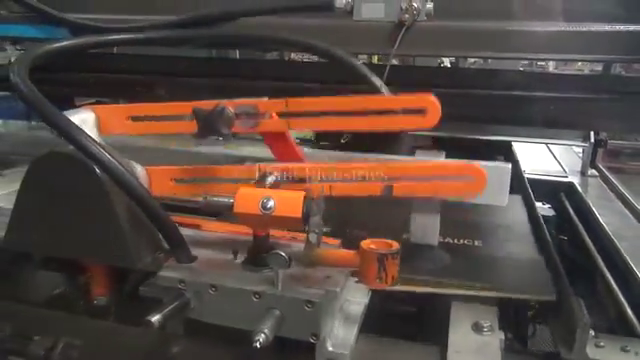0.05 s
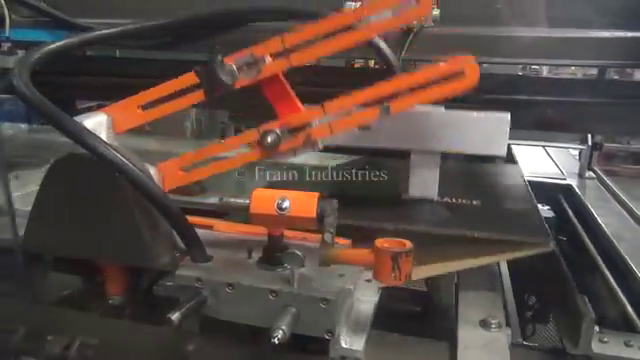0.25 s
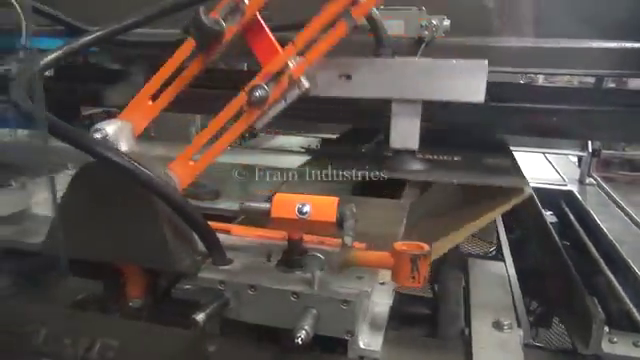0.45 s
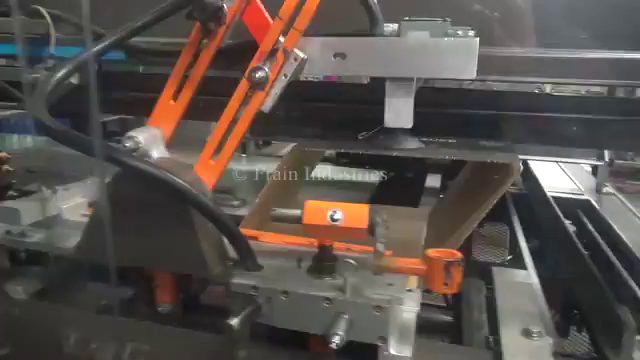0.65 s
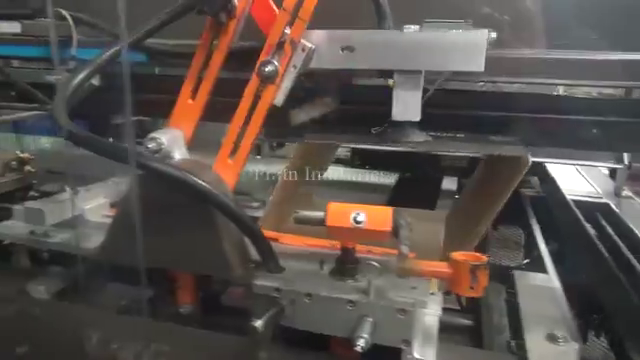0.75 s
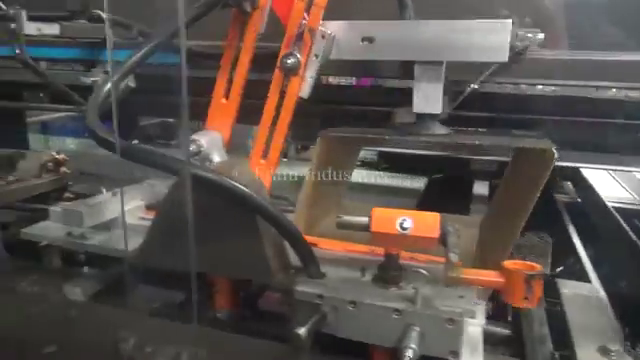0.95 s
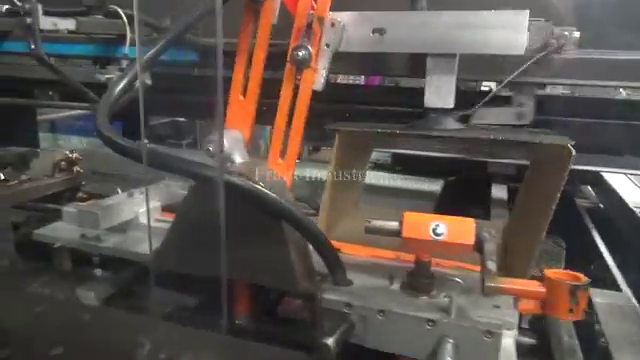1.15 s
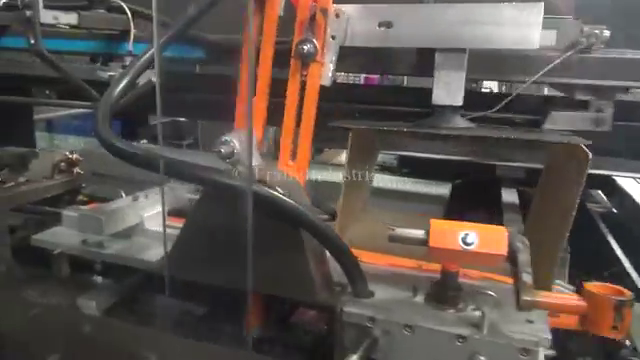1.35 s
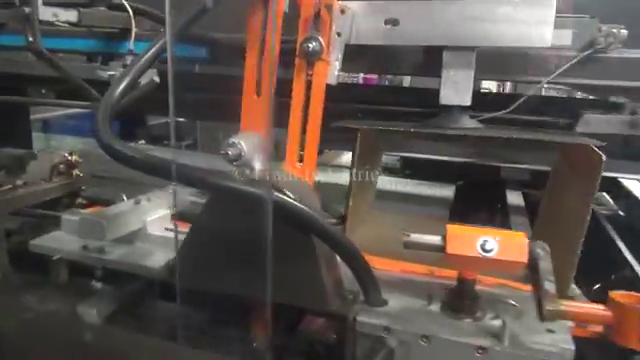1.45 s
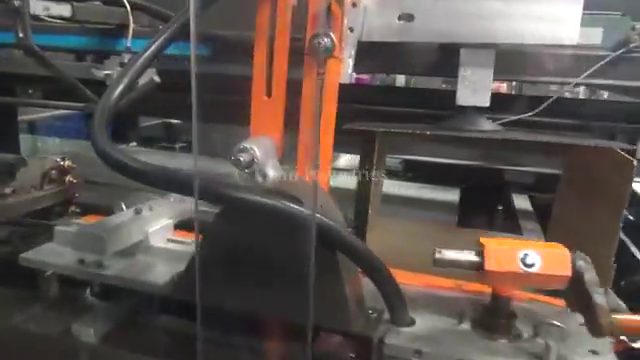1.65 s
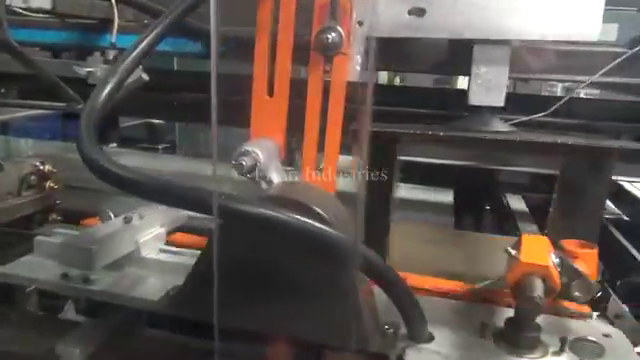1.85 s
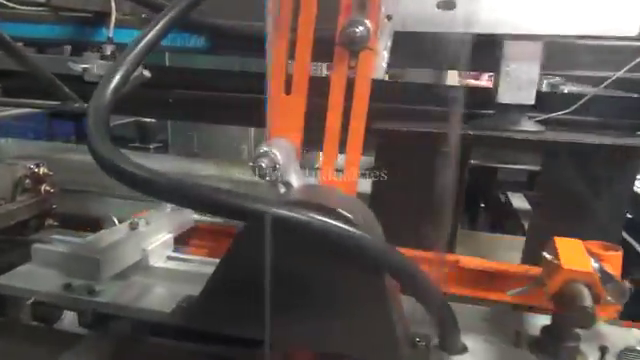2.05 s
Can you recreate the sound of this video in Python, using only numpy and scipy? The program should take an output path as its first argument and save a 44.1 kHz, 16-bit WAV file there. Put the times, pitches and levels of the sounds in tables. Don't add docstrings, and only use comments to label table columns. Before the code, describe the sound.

Box-erecting machine cycling: motor rumble, hard stop hit and cardboard slap, later knocks and a pneumatic hiss

```python
import sys
import numpy as np
from scipy import signal
from scipy.fft import rfft, irfft
from scipy.io import wavfile
from scipy.ndimage import uniform_filter1d

SR = 44100
rng = np.random.default_rng(int(sys.argv[2]) if len(sys.argv) > 2 else 0)


def linear_from_db(decibels):
    return 10 ** (np.asarray(decibels, float) / 20)


def generate_wav(sig):
    pcm = np.round(np.clip(np.atleast_2d(sig).T, -1, 1) * 32767).astype(np.int16)
    wavfile.write(sys.argv[1], SR, pcm)


N = 92610


def level(x, db):
    return x * linear_from_db(db) / np.sqrt(np.mean(x ** 2))


def curve(rows):
    rows = np.array(rows)
    return np.interp(np.arange(N) / SR, rows[:, 0], rows[:, 1])


def walk(rate_hz):
    held = int(SR / rate_hz)
    steps = np.repeat(rng.standard_normal(200)[:N // held + 1], held)
    smooth = uniform_filter1d(uniform_filter1d(steps, held), held)
    return 1.3 * smooth[:N]


def ring(push, hz, t60):
    pole = np.exp((2j * np.pi * hz - np.log(1000) / t60) / SR)
    return signal.lfilter([1], [1, -pole], push + 0j).imag


def narrow_band(hz, width_hz):
    once = ring(rng.standard_normal(N), hz, 1.4 / width_hz)
    return level(ring(once, hz, 1.4 / width_hz), 0)


def coloured(points, flicker_db, rate_hz, grit_db):
    point_hz, point_db = np.array(points).T
    hz = np.maximum(np.arange(N // 2 + 1) * SR / N, 1)
    grains = rng.standard_normal(N)
    grit = np.minimum(rng.exponential(size=N), 4)
    colour_db = np.interp(np.log(hz), np.log(point_hz), point_db, left=-90, right=-90)
    spectrum = rfft(grains * linear_from_db(grit_db * grit)) * linear_from_db(colour_db)
    octave = np.log2(hz / 30)
    total = np.zeros(N)
    for k in range(10):
        share = np.clip(1 - abs(octave - k), 0, 1)
        total += irfft(spectrum * share, N) * linear_from_db(flicker_db * walk(rate_hz))
    return level(total, 0)


def puffs(rows):
    t = np.arange(N) / SR
    total = np.zeros(N)
    for start, db, attack, hold, t60 in rows:
        swell = np.clip((t - start) / attack, 0, 1) ** 2
        fading = np.maximum(t - start - attack - hold, 0)
        total += swell * linear_from_db(db - 60 * fading / t60)
    return total


def blows(hits, body, scatter_db, crack_db):
    out = np.zeros(N)
    t = np.arange(SR // 4) / SR
    hz, gain_db, t60 = np.array(body).T[:, :, None]
    sign = (-1) ** np.arange(len(body))[:, None]
    lucks = rng.standard_normal((16, 2, 14, 1))[:, :, :len(body)]
    noises = rng.standard_normal((16, len(t)))
    for (start, db, contact_ms), (luck_db, luck_hz), noise in zip(hits, lucks, noises):
        fade = linear_from_db(gain_db + scatter_db * luck_db - 60 * t / t60)
        rings = sign * fade * np.sin(2 * np.pi * hz * (1 + .006 * luck_hz) * t)
        push = np.sin(np.pi * np.clip(t[:400] * 1000 / (2 * contact_ms), 0, 1)) ** 2
        knock = signal.fftconvolve(rings.sum(0), push)
        crack = linear_from_db(crack_db) * noise * np.exp(-t / .0013)
        knock = knock / abs(knock).max() + signal.fftconvolve(crack, push / np.linalg.norm(push))
        i = int(start * SR)
        out[i:i + len(knock)] += linear_from_db(db) * knock[:N - i]
    return out


def hall_floor():
    # f/Hz, level/dB
    hall_colour = [(15, -33), (25, -21), (59, -2.5), (164, -9.5), (762, -31), (2360, -26), (2700, -28.5),
                   (9810, -33), (15500, -39.5)]
    return linear_from_db(-41.5) * coloured(hall_colour, flicker_db=2.06, rate_hz=8.08, grit_db=3.0)


def drives():
    # t/s, level/dB
    effort = [(0, -37.5), (.1, -35), (.3, -32), (.45, -29.5), (.62, -32), (.74, -35), (.9, -34),
              (1.05, -38), (1.22, -35.5), (1.45, -41.5), (1.58, -40.5), (1.7, -29.5), (1.88, -37),
              (2.1, -40.5)]
    # f/Hz, level/dB
    frame_colour = [(24, -29), (40, -30), (140, 0.5), (205, -5.5), (320, -8.5), (377, -2.5), (916, -9),
                    (1780, -14.5), (5000, -34.5), (6500, -75), (11000, -120)]
    # f/Hz, width/Hz, level/dB
    resonances = [(113, 16, -15.5), (258.6, 49, -4), (318.6, 26.5, -5), (459, 67, -8)]
    broad = coloured(frame_colour, flicker_db=2.0, rate_hz=13.73, grit_db=1.5)
    drone = np.zeros(N)
    for hz, width_hz, db in resonances:
        tone = ring(rng.standard_normal(N), hz, 2.0 / width_hz)
        drone += level(tone, db) * linear_from_db(2.6 * walk(9.22))
    return linear_from_db(curve(effort)) * (linear_from_db(-2.0) * broad + linear_from_db(-3.0) * drone)


def hum():
    # t/s, level/dB
    motor_load = [(0, -51), (.45, -37), (1, -53), (1.5, -39), (1.95, -34), (2.1, -46)]
    hz = 61.74 * (1 + 0.0545 * walk(12))
    tone = np.sin(2 * np.pi * np.cumsum(hz) / SR)
    return linear_from_db(curve(motor_load) + 1.8 * walk(14.0)) * tone


def leak():
    # t/s, level/dB
    leak_strength = [(0, -41.5), (.25, -44.5), (.42, -40), (.62, -49), (1, -54), (1.55, -67), (1.75, -43.5),
                     (1.9, -53), (2.1, -54)]
    # f/Hz, level/dB
    leak_colour = [(1500, -21), (2500, -5), (4000, -9), (6800, -3.5), (9000, -6), (11200, -5), (15000, -8),
                   (15600, -20)]
    return linear_from_db(curve(leak_strength) + 1.5) * coloured(leak_colour, flicker_db=.8, rate_hz=20, grit_db=1.5)


def whine():
    # t/s, extra level/dB
    inverter_load = [(0, -1), (.2, -1), (.24, 7), (.285, 7), (.305, -1), (.66, -1), (.7, 0), (1.2, 0),
                     (1.35, -2), (2.1, -2)]
    width_hz = 90
    whistle = level(ring(rng.standard_normal(N), 10106, 2.2 / width_hz), -54)
    return whistle * linear_from_db(curve(inverter_load) + walk(12))


def belts():
    # f/Hz, width/Hz, level/dB
    bands = [(3700, 500, -60), (9700, 1300, -58)]
    return sum(linear_from_db(db + 2.5 * walk(70)) * narrow_band(hz, width_hz) for hz, width_hz, db in bands)


def scrapes():
    # t/s, level/dB, attack/s, hold/s, fade by 60 dB/s
    strokes = [
        (.04, -37, 0.14, 0.15, 0.18),
        (1.612, -33.5, 0.005, 0.047, 0.086),
        (1.665, -26.5, .012, 0.022, 0.13),
        (0.345, -30, 0.014, 0.088, 0.17),
        (.462, -27.5, 0.0018, 0.01, 0.099),
        (0.5, -49, 0.0038, 0.03, 0.059),
        (.755, -40.5, .003, 0.031, 0.071),
    ]
    # f/Hz, level/dB
    board_colour = [(250, -13), (500, 5), (1100, 4), (2200, -11), (4000, -19.5), (6000, -35)]
    return puffs(strokes) * coloured(board_colour, flicker_db=3.5, rate_hz=70, grit_db=2.0)


def box():
    # f/Hz, level/dB, fade by 60 dB/s
    box_modes = [(190, -12, .12), (255, -10, .25), (332, 0, .4), (436, -10, .3), (624, -12, .15)]
    # t/s, peak level/dB, contact/ms
    box_hits = [
        (1.6105, -14.5, .5),
        (1.649, -22, .6),
        (1.818, -25, .8),
        (1.87, -30, .8),
        (.255, -27, .8),
    ]
    return blows(box_hits, box_modes, scatter_db=4.8, crack_db=-40)


def vents():
    # t/s, level/dB, attack/s, hold/s, fade by 60 dB/s
    vent_puffs = [
        (.34, -44, .05, .07, .3),
        (1.671, -22.5, .016, .008, .12),
        (1.690, -26, .008, .004, .1),
        (1.70, -40, .02, .06, .32),
        (.572, -45, .008, .005, .08),
        (1.17, -45, .04, .06, .1),
        (1.21, -47, .04, .018, .06),
        (1.536, -50, .005, .025, .08),
    ]
    # f/Hz, level/dB
    air_colour = [(700, -30), (1250, -2), (3900, -8), (5200, 0), (6800, -6), (12000, -4), (15000, -5),
                  (15600, -15)]
    return puffs(vent_puffs) * coloured(air_colour, flicker_db=2.4, rate_hz=90, grit_db=3)


def pins():
    # f/Hz, level/dB, fade by 60 dB/s
    pin_modes = [(11500, 0, .13), (14000, -6, .08)]
    # t/s, peak level/dB, contact/ms
    pin_hits = [
        (.37, -38, .03),
        (.39, -38, .03),
        (.784, -44, .03),
        (.849, -42, .03),
        (.91, -46, .03),
        (1.54, -42, .025),
        (1.553, -43, .03),
    ]
    return blows(pin_hits, pin_modes, scatter_db=2, crack_db=-24)


def stops():
    # f/Hz, level/dB, fade by 60 dB/s
    stop_modes = [(98.7, -11, 0.12), (216, -8, 0.083), (296.4, -7.5, 0.14), (372.5, -4, 0.096),
                  (450, -2, 0.032), (704, -8, 0.038), (830, -11, 0.06), (1340, -32, 0.051),
                  (2280, -1.5, 0.011), (5900, 1, 0.0065), (7400, -28, 0.013)]
    # t/s, peak level/dB, contact/ms
    stop_hits = [
        (.3966, -5.5, 0.12),
        (.4035, -9, 0.98),
        (.424, -15, 0.67),
    ]
    return blows(stop_hits, stop_modes, scatter_db=4.0, crack_db=-21)


def ticks():
    # t/s, peak level/dB, f/Hz
    snaps = [
        (.3975, -20, 6500),
        (.4607, -4.5, 850),
        (1.5981, -19, 10500),
        (1.6098, -28, 4200),
        (1.6107, -20, 400),
        (1.6842, -13, 260),
        (1.6985, -14, 280),
        (1.7325, -23, 250),
    ]
    t = np.arange(N) / SR
    total = np.zeros(N)
    for start, db, hz in snaps:
        cycles = (t - start) * hz
        total -= linear_from_db(db + 4) * np.exp(-(cycles / .5) ** 2) * np.sin(2 * np.pi * cycles)
    return total


def flaps():
    # f/Hz, level/dB, fade by 60 dB/s
    flap_modes = [(116.5, -4, 0.17), (189, 2.5, 0.041), (305, 0, 0.063), (470, 2.5, 0.073),
                  (540, -1.5, 0.022), (730, -36.5, 0.014), (776, -11.5, 0.1), (885, -6.5, 0.025),
                  (1135, -8, 0.032), (1430, -3, 0.02), (1624, -0.5, 0.012), (1900, -4, .022),
                  (2220, -11, 0.012)]
    # t/s, peak level/dB, contact/ms
    flap_hits = [
        (.4594, -2, 0.2),
        (.473, -26, 0.49),
        (.492, -13.5, 0.96),
        (.532, -19, 1),
        (.57, -18.5, 0.96),
    ]
    return blows(flap_hits, flap_modes, scatter_db=2.0, crack_db=-16)


def spits():
    # t/s, level/dB, attack/s, hold/s, fade by 60 dB/s
    spit_puffs = [(.545, -47, .004, .01, .08), (.579, -36, .001, .003, .04), (.664, -45, .002, .004, .1),
                  (1.100, -45, .001, .004, .05), (1.124, -46, .003, .005, .04),
                  (1.243, -42.5, .002, .008, .05), (1.263, -42, .001, .006, .05),
                  (1.320, -43, .001, .004, .06), (1.334, -46, .002, .004, .06),
                  (1.350, -47, .002, .006, .06), (1.386, -48, .002, .004, .05),
                  (1.498, -48, .001, .003, .05), (1.783, -45, .002, .004, .05)]
    # f/Hz, level/dB
    spit_colour = [(4000, -20), (6200, -4), (7500, -7), (9000, 0), (10500, -1), (12500, -5), (15000, -12)]
    return puffs(spit_puffs) * coloured(spit_colour, flicker_db=1.5, rate_hz=80, grit_db=2)


def cartons():
    # f/Hz, level/dB, fade by 60 dB/s
    carton_modes = [(59.5, -14, 0.14), (101, -16.5, 0.46), (195, -10.5, 0.098), (268, -2.5, 0.11),
                    (348, 2, 0.049), (452.3, -1.5, 0.17), (580, -8, 0.043), (670, -14, 0.031),
                    (796, -8, 0.059), (1212, -4.5, 0.046), (1750, 1, 0.023), (2390, -5, 0.0097),
                    (4260, -30, 0.0091)]
    # t/s, peak level/dB, contact/ms
    carton_hits = [
        (.760, -19, 0.33),
        (.768, -27, 0.45),
        (1.180, -24.5, 0.69),
        (1.6095, -13.5, 0.093),
        (1.623, -23, 1.05),
        (1.655, -28, 0.36),
        (.898, -22.5, 1.24),
        (1.888, -35, 0.54),
        (1.96, -28, 4.1),
    ]
    return blows(carton_hits, carton_modes, scatter_db=5.0, crack_db=-6.5)


def steel():
    # f/Hz, level/dB, fade by 60 dB/s
    steel_modes = [(2907, 0, .16), (3750, -9, .14), (5200, -12, .07), (6191, -10, .17), (6680, -7, .1)]
    # t/s, peak level/dB, contact/ms
    steel_hits = [
        (.820, -32.5, .03),
    ]
    return blows(steel_hits, steel_modes, scatter_db=0, crack_db=-18)


def latches():
    # f/Hz, level/dB, fade by 60 dB/s
    latch_modes = [(750, -4, .025), (2200, -1, .014), (3500, -10, .01), (4800, -2, .012), (5700, -2, .011),
                   (6600, -2, .011)]
    # t/s, peak level/dB, contact/ms
    latch_hits = [
        (1.1855, -23.5, .05),
        (1.188, -26, .09),
        (1.2645, -23, .04),
        (1.268, -27, .04),
    ]
    return blows(latch_hits, latch_modes, scatter_db=1.5, crack_db=-12)


def bottom():
    # f/Hz, level/dB, fade by 60 dB/s
    bottom_modes = [(205, -9, 0.068), (262, -0.5, 0.086), (401, -4.5, 0.15), (533, -4.5, 0.12)]
    # t/s, peak level/dB, contact/ms
    bottom_hits = [
        (1.2645, -21.5, 1),
        (1.6832, -13.5, 0.78),
        (1.6995, -29, 0.41),
    ]
    return blows(bottom_hits, bottom_modes, scatter_db=-0.2, crack_db=-32)


def chain_link():
    # t/s, level/dB, attack/s, hold/s, fade by 60 dB/s
    grates = [
        (1.538, -49.5, .004, .022, .09),
        (1.632, -50, .008, .025, .08),
    ]
    return puffs(grates) * (narrow_band(2950, 450) + narrow_band(3780, 450))


def hall(x):
    t60, wet_db, dull_hz = 0.32, -13, 2680
    t = np.arange(SR) / SR
    tail = rng.standard_normal(SR) * linear_from_db(-60 * t / t60) * np.clip(t / 0.0028, 0, 1)
    tail = signal.lfilter(*signal.butter(1, dull_hz, fs=SR), tail)
    tail = tail / np.sqrt(np.sum(tail ** 2))
    return linear_from_db(wet_db) * signal.fftconvolve(x, tail)[:N]


def scene():
    knocks = latches() + steel() + pins() + stops() + flaps() + cartons() + ticks()
    booms = box() + bottom()
    murmur = hall_floor()
    knocks = knocks + hall(knocks)
    machine = drives() + scrapes() + hum()
    air = leak() + vents()
    sizzle = whine() + belts() + chain_link() + spits()
    return (knocks + booms + murmur + machine + air + sizzle)[None]


def low_pass(x):
    return signal.sosfilt(signal.butter(12, 15810, fs=SR, output="sos"), x)


def record(dry):
    bass_cut_hz, top_hz = 6.2, 15120
    mix = signal.lfilter(*signal.butter(2, bass_cut_hz, "high", fs=SR), dry)
    mix = signal.sosfilt(signal.ellip(8, .2, 60, top_hz, fs=SR, output="sos"), mix)
    return low_pass(mix)


dry = scene()
out = record(dry)
generate_wav(out)
```